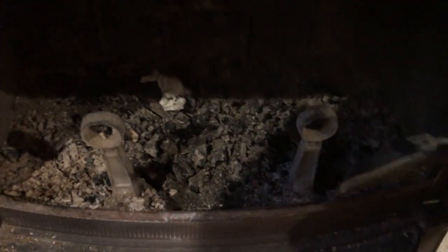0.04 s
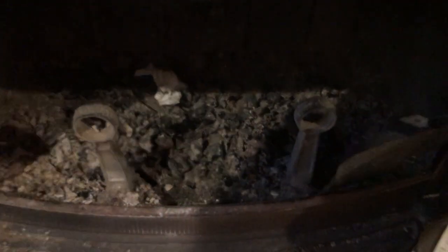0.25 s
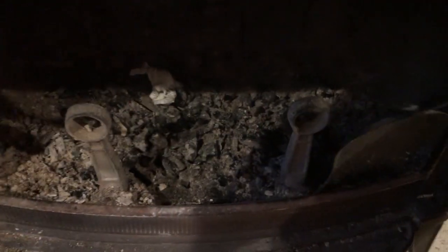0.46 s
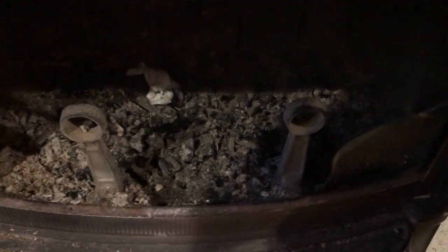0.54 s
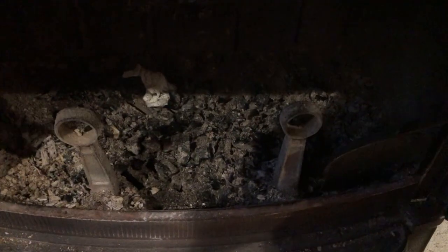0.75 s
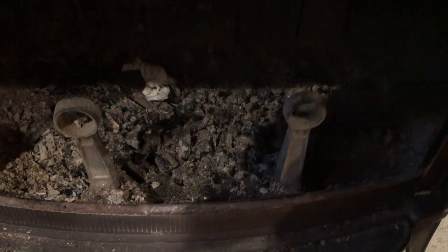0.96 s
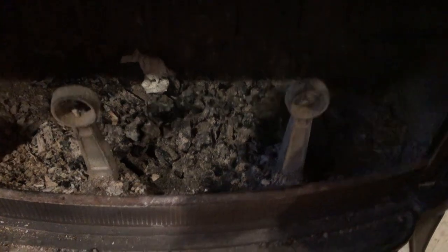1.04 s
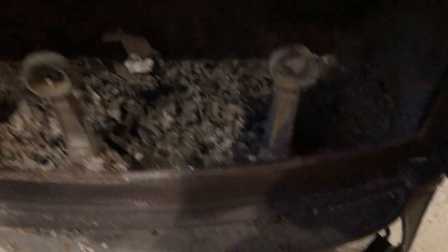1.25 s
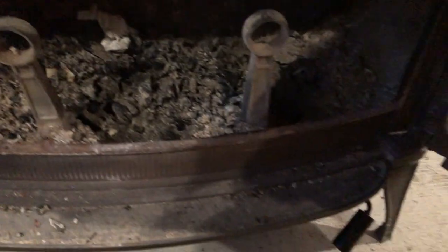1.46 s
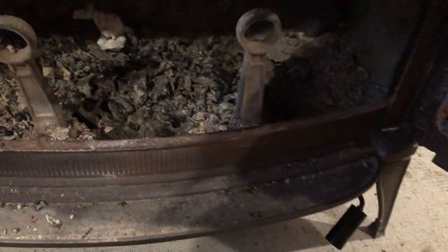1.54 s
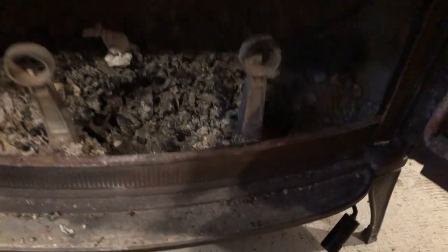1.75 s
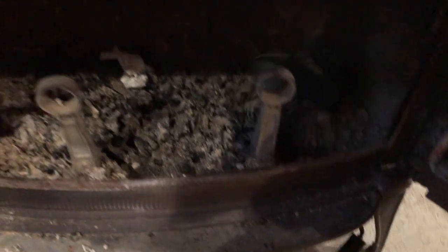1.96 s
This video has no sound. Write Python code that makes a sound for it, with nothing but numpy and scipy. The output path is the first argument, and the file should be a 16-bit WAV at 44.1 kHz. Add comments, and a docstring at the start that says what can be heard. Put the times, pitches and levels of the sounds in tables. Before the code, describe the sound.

Metal shovel scraping and knocking in the ash and charcoal of an iron stove.

```python
"""A steel shovel is pushed twice through the ash of a wood stove, hits the iron wall and sheds its
crumbs, then knocks on the front rim and is dragged across the gritty floor. Friction and impact supply
the force: its treble and middle excite the modes of the blade, its bass those of the stove body, and
the firebox booms after it. The room is quiet; the sound is heard on the left channel."""
import sys
import numpy as np
from scipy import signal
from scipy.fft import rfft, irfft
from scipy.io import wavfile
from scipy.ndimage import uniform_filter1d, map_coordinates

SR = 44100
rng = np.random.default_rng(int(sys.argv[2]) if len(sys.argv) > 2 else 0)


def materialize(psi):
    """Save the field psi as 16-bit PCM at rate SR to the path in sys.argv[1].

    A 1-D psi becomes a single channel; in a 2-D psi each row is a channel.
    """
    bounded = np.clip(np.atleast_2d(psi).T, -1, 1)
    quanta = np.round(bounded * 32767).astype(np.int16)
    wavfile.write(sys.argv[1], SR, quanta)


N = 88200
LOW_HZ, HIGH_HZ, TOP_HZ = 703.2, 3145, 15850  # upper edges of bass, middle and treble
SLIP_PER_S, SLIP_DB = 260, 3.5  # rate and depth of stick-slip fluctuation
DUST_LOW_HZ = 2460

# impacts of the shovel: start_s, contact_s, treble_db, middle_db, bass_db, rim_db
IMPACTS = [(0.217,.005,-31.5,-62,-41,-68),(0.7914,0.0057,-28.5,-28,-37.5,-70),(0.803,0.0077,-53,-51,-27,-66),(0.8172,0.0053,-34,-34,-20.5,-59),(0.832,0.0022,-38,-55,-23.5,-60),(0.842,0.0056,-43.5,-36.5,-30,-61),(0.853,0.01,-40.5,-45.5,-31,-73),
           (1.415,0.0051,-38,-35.5,-44,-63.5),(1.42,0.0034,-25.5,-53,-53.5,-29),(1.4394,0.0076,-31.5,-36,-37.5,-42),(1.471,0.012,-37.5,-75,-42.5,-78),(1.5487,0.008,-35.5,-47.5,-53,-55.5),(1.5939,0.011,-33,-45.5,-38.5,-66),(1.635,0.0077,-32.5,-38,-58,-80),(1.6965,0.0039,-33,-34,-39.5,-53),(1.7173,0.0043,-52,-40,-35,-54),(1.732,0.0065,-41,-37,-48,-48)]


def grit(per_s=5000, spread_db=4):
    """Stick-slip friction: tiny contacts at random times, their strength swelling and sinking."""
    contacts = (rng.random(N) < per_s / SR) * rng.choice([-1, 1], N)
    strength = undb(spread_db * rng.standard_normal(N).clip(-2, 2))
    return unit(contacts * strength * undb(SLIP_DB * wander(SLIP_PER_S)))


def scrapes():
    """Sliding friction: the force of each of the three strokes, in treble, middle and bass."""
    # envelopes of the strokes: time_s, treble_db, middle_db, bass_db
    first_push = [(.214,-84,-95,-65.5),(.222,-37,-48.5,-59),(.236,-42.5,-59.5,-50.5),(.262,-44,-54,-50),(.274,-46,-57.5,-52),(.306,-45,-54.5,-53),(.313,-37,-54,-49.5),(.364,-40.5,-46,-50),(.38,-57.5,-67.5,-48.5),(.408,-58.5,-53.5,-54.5),(.46,-59,-62.5,-59.5)]
    second_push = [(.46,-53,-63.5,-59),(0.507,-42,-58,-58.5),(.545,-34,-46,-46.5),(.602,-29.5,-35.5,-38.5),(0.622,-29.5,-38,-39),(0.633,-77,-44.5,-48),(.658,-51.5,-55.5,-51.5),(.748,-50,-59.5,-62),(0.788,-49,-55.5,-45.5)]
    drag = [(1.489,-67,-85,-59),(1.533,-45,-65,-57),(1.544,-35.5,-68,-43.5),(1.565,-41,-56,-51),(1.584,-36.5,-41,-50),(1.593,-30.5,-38,-40.5),(1.619,-32.5,-36.5,-47),(1.632,-42.5,-51,-39.5),(1.66,-31.5,-33,-40.5),(1.673,-31.5,-42,-41),(1.684,-61,-59,-49.5),(1.713,-42.5,-49,-41),(1.732,-36,-35.5,-38.5),(1.746,-44.5,-57,-52.5),(1.826,-54,-63.5,-77),(1.917,-54.5,-66.5,-72),(1.957,-49,-51.5,-52),(2.0,-45.5,-59.5,-59)]
    # friction spectra: frequency_hz, first_push_db, second_push_db, drag_db
    spectra = [(30,-20.5,-29.5,-35),(64.4,3,-17.5,6),(140,5,2.5,-9),(215,5,2.5,1.5),(320,6.5,-5,9),(540,6,2,6.5),(738,2,2,5.5),(1060,4,3.5,-2.5),(1950,1.5,2.5,0.5),(2800,-4.5,-2.5,-8),(3800,0.5,-5,-2.5),(7600,-3,-1.5,-6.5),(10000,-2,-4,-2.5),(11900,-10.5,-7.5,-8.5),(15730,-6,-4.5,-8.5)]
    hz, *colours = np.transpose(spectra)
    forces = []
    for stroke, colour in zip([first_push, second_push, drag], colours):
        times, *levels = np.transpose(stroke)
        friction = bands(tint(grit(), hz, colour))
        forces.append(np.array([band * curve(times, db) for band, db in zip(friction, levels)]))
    return forces


def blows():
    """Impact as a brief chatter of contacts: its force in three bands, and the impulses on the rim."""
    # impact spectrum: frequency_hz, level_db
    spectrum = [(30,-21),(60,-14),(110,1),(190,-5),(400,2),(600,-8),(800,-9),(1400,-3),(2500,0),(3500,-2.5),(7500,2),(10000,-3),(15800,-7.5)]
    chatter = tint(grit(), *np.transpose(spectrum))
    force, rim_push = 0, np.zeros(N)
    for start_s, contact_s, *band_db, rim_db in IMPACTS:
        pulse = burst(start_s, contact_s) + 1e-12
        pulse_rms = np.sqrt(np.mean(pulse ** 2))
        force += np.array(bands(chatter * pulse)) * pulse_rms * undb(band_db)[:, None]
        rim_push[int(start_s * SR)] = undb(rim_db) * np.sqrt(contact_s * SR)
    return force, rim_push


def bite(gain_db=-8):
    """Onset transient: a hard click as steel meets iron at each blow."""
    clicks = np.zeros(N)
    for start_s, contact_s, treble_db, *_ in IMPACTS:
        clicks[int(start_s * SR)] = undb(treble_db + gain_db) * np.sqrt(contact_s * SR)
    return cut(clicks, HIGH_HZ, "high", order=2)


def blade_responses():
    """Modal resonance: each of five ways of holding the blade weights the same modes differently."""
    # blade modes: pitch_hz, t60_s, first_push_db, second_push_db, drag_db, struck_db, free_db
    blade_modes = [(1085,0.17,-8.5,-23.5,-21,-7,-30),(1629,0.047,-40,-22,-11,-6,-10),(1681,0.18,-6.5,-4,-20,-6,1),(2483,0.085,-32,-19,-22,-11,-21),(2631,0.2,-31,-7.5,-27,-13,-2),(2720,0.064,-38,-23,-31,-6.5,-27.5),(3137,0.28,-20,-27.5,-15,-24.5,-12.5),(3410,0.21,-14.5,-26,-39,-45.5,-28),(3565,0.11,-14.5,-25,-32,-35.5,-33),(3860,.16,-10.5,-21,-28,-33.5,-21),(3956,0.074,-13,-21.5,-26,-12.5,-15),(4082,0.12,-12.5,-13,-21,-19,-28),(4425,0.23,-24.5,-27.5,-41,-27.5,-16),(5100,0.19,-25,-23,-36,-34.5,-47),(5350,0.18,-22,-18,-22,-15,-40),(5650,0.093,-12.5,-22.5,-41,-23,-42),(5940,0.057,-26,-18.5,-20,-14,-14),(6210,0.063,-22,-18,-11.5,-28,-7.5),(7080,0.15,-9,-15.5,-28,-27.5,-18),(7479,0.28,-34,-23,-32,-28,-10),(7780,0.076,-14,-15.5,-33,-17.5,-9),(8179,0.152,-29.5,-15.5,-30,-21.5,-20),(8550,0.072,-30,-18.5,-12,-24,-11),(9260,.18,-19,-23,-14,-22.5,-20),(9750,.17,-24.5,-19.5,-20,-31,-18),(11922,.14,-23.5,-23.5,-11,-25,-18)]
    hz, t60, *weightings = np.transpose(blade_modes)
    band_hz = np.where(hz < HIGH_HZ, HIGH_HZ - LOW_HZ, TOP_HZ - HIGH_HZ)
    return [modes(hz, t60, db + 10 * np.log10(2 * band_hz / SR)) for db in weightings]


def waver(ring, depth=0.001, per_s=23):
    """Frequency modulation: the blade's pitch shifts a little as the point of contact moves."""
    return map_coordinates(ring, [np.arange(N) + np.cumsum(depth * wander(per_s))], order=3)


def sheet_response(count=150):
    """Superposition of the shovel's many weak modes, the direct path and the reflections."""
    t = clock()[:N // 4]
    hz = np.linspace(LOW_HZ, TOP_HZ, count) + (TOP_HZ - LOW_HZ) / count * (rng.random(count) - .5)
    ring = np.sin(2 * np.pi * (hz[:, None] * t + rng.random((count, 1)))).sum(axis=0)
    steel = undb(-5) * np.pad(fade(ring, t60_s=.14), (0, N - len(t)))
    steel[0] += undb(-8)  # direct path
    firebox_echoes = undb(-3.5) * fade(rng.standard_normal(N), t60_s=.027)
    room_tail = undb(-15) * fade(rng.standard_normal(N), t60_s=.22)
    return steel + firebox_echoes + room_tail


def judders():
    """Stick-slip oscillation: the pushed blade groans at a low, unsteady pitch."""
    # groans: centre_s, half_length_s, pitch_hz, width_hz, level_db
    groans = [(.48,.065,162,22,-56),(.6,.035,135,70,-48)]
    out = 0
    for centre_s, half_s, hz, width_hz, db in groans:
        swell = np.exp(-((clock() - centre_s) / half_s) ** 2)
        phase = 2 * np.pi * np.cumsum(hz + width_hz / 2 * wander(width_hz * 2)) / SR
        out += undb(db + SLIP_DB * wander(width_hz * 2)) * swell * np.sqrt(2) * np.sin(phase)
    return out


def stove_response(split_hz=267, rise_s=0.0049):
    """Impulse response of the iron: a knock, its modes, and a deep thud delayed by the plates' inertia."""
    # body modes: pitch_hz, t60_s, level_db
    iron_modes = [(108,0.026,-14),(143,0.17,-14.5),(268.2,0.41,-13.5),(358.4,0.24,-13.5),(441.5,0.18,-21),(509,0.17,-12.5),(592.7,0.048,-4.5),(775,0.99,-14.5),(881,0.75,-26),(1045,0.92,-17.5)]
    noise = fade(rng.standard_normal(N), t60_s=.07)
    knock = undb(-3) * noise
    knock[0] += undb(-4)  # direct path
    rise = 1 - np.exp(-(clock() / rise_s) ** 2)
    thud = cut(noise * rise, split_hz, "low", order=3)
    thud *= undb(-5) * np.sqrt(2 * split_hz / SR) / np.linalg.norm(thud)
    ring = modes(*np.transpose(iron_modes)) * np.sqrt(2 * LOW_HZ / SR)
    return cut(knock, split_hz, "high", order=3) + thud + ring


def firebox_response():
    """Cavity reverberation: the long hollow boom that follows a contact."""
    # cavity spectrum: frequency_hz, level_db
    spectrum = [(40,-11.5),(75,0),(170,-0.5),(270,-3.5),(450,0),(560,1),(680,-15.5),(880,-6.5),(1400,-11.5),(2500,-35)]
    boom = tint(rng.standard_normal(N), *np.transpose(spectrum))
    return undb(-11) * np.sqrt(2 * LOW_HZ / SR) * fade(boom, t60_s=1.7)


def front_rim(push, rest_s=1.535, damping_t60_s=0.047):
    """Contact damping: the rim rings freely until the shovel rests on it."""
    # rim modes: pitch_hz, t60_s, level_db
    rim_modes = [(448,0.71,-0.5),(585,0.25,-2.5),(628,0.16,1),(1093,0.33,-25),(1640,0.16,-17.5),(2830,0.111,-7.5)]
    ring = modes(*np.transpose(rim_modes))
    held_s = np.maximum(clock() - rest_s, 0)
    free = through(push * (held_s == 0), ring) * np.exp(-np.log(1000) * held_s / damping_t60_s)
    damped = through(push * (held_s > 0), fade(ring, damping_t60_s))
    return cut(free + damped, 310, "high")  # the rim's ring carries no bass below about 310 Hz


def crackle(scrape_treble):
    """Brittle fracture of charcoal: sparse snaps that follow the scraping, and a few big lumps."""
    # cracking lumps: start_s, level_db
    cracks = [(.311,-41),(0.366,-29),(0.5967,-27.5),(0.603,-34),(.612,-30.5),(0.625,-33),(1.6575,-29),(1.74,-32)]
    strength = np.sqrt(np.abs(uniform_filter1d(scrape_treble ** 2, int(SR / SLIP_PER_S))))
    snaps = undb(-9) * strength * unit(cut(grit(per_s=260), HIGH_HZ, "high", order=1))
    envelope = sum(undb(db) * burst(s, length_s=.0013) for s, db in cracks)
    return snaps + unit(cut(grit(), LOW_HZ, "high")) * envelope


def spill():
    """Granular flow: fine ash hisses off the lifted blade and trickles away."""
    # envelope of the flow: time_s, level_db
    flow = [(.9,-57),(.921,-50.5),(.936,-37),(.948,-41),(.962,-48),(1.0,-66),(1.14,-64.5),(1.22,-83),(1.4,-81.5)]
    return unit(cut(grit(per_s=2300), DUST_LOW_HZ, "high", order=3)) * curve(*np.transpose(flow))


def cinders(edge_ratio=1.06):
    """Damped resonance: bits of charcoal land with a dusty tick and tinkle briefly."""
    # landings: start_s, level_db, pitch_hz
    landings = [(1.026,-56,7550),(1.0564,-51,8400),(1.071,-57,6500),(1.093,-60,8100),(1.1362,-54.5,3670),(1.156,-53.5,2820),(1.1872,-57.5,3044)]
    out = 0
    for start_s, db, hz in landings:
        tick = rng.standard_normal(N) * burst(start_s, length_s=.003)
        tinkle = cut(tick, [hz / edge_ratio, hz * edge_ratio], "band", order=1)
        dust = undb(-1) * cut(tick, DUST_LOW_HZ, "high")
        out += undb(db) * (tinkle * np.std(tick) / np.std(tinkle) + dust)
    return out


def bumps():
    """Handling noise: two soft, low bumps."""
    # handling bumps: start_s, level_db
    handling = [(1.213,-55),(1.293,-52.5)]
    envelope = sum(undb(db) * burst(s, length_s=.018) for s, db in handling)
    push = unit(cut(grit(), [206, 333], "band", order=3)) * envelope
    return cut(push, LOW_HZ, "low")


def room():
    """Ambient noise floor: faint, steady and strongest in the bass."""
    frequency_hz = [25, 70, 160, 400, 1500, 5000, 12000, 15000]
    level_db = [4, 1.5, -1, -4.5, -13.5, -19, -23.5, -38]
    return undb(-74) * unit(tint(rng.standard_normal(N), frequency_hz, level_db))


def modes(hz, t60_s, db):
    """Modal synthesis: a sum of damped sinusoids."""
    t = clock()[:N // 2]
    ring = sum(undb(d) * fade(np.sin(2 * np.pi * f * t), s) for f, s, d in zip(hz, t60_s, db))
    return np.pad(ring, (0, N - len(t)))


def fade(x, t60_s):
    """Exponential decay, scaled to unit energy."""
    y = x * np.exp(-np.log(1000) * np.arange(len(x)) / SR / t60_s)
    return y / np.linalg.norm(y)


def through(x, response):
    """Convolution with an impulse response."""
    return signal.fftconvolve(x, response)[:N]


def burst(start_s, length_s):
    """Half-Gaussian envelope of a contact: sudden onset, smooth release."""
    age = (clock() - start_s) / length_s
    return (age >= 0) * np.exp(-age ** 2)


def curve(times, db):
    """Gain interpolated in decibels, silent outside the given times."""
    return undb(np.interp(clock(), times, db, left=-200, right=-200))


def wander(per_s):
    """Linear interpolation between Gaussian random values."""
    return np.interp(clock() * per_s, np.arange(N), rng.standard_normal(N))


def bands(x):
    """Crossover into treble, middle and bass, each at rms 1."""
    treble = cut(x, HIGH_HZ, "high")
    middle = cut(x, [LOW_HZ, HIGH_HZ], "band")
    bass = cut(x, LOW_HZ, "low", order=3)
    return unit(treble), unit(middle), unit(bass)


def tint(x, hz, db):
    """Spectral shaping along a gain curve in log frequency."""
    f = np.maximum(np.arange(N // 2 + 1) * SR / N, 1)
    return irfft(rfft(x) * undb(np.interp(np.log(f), np.log(hz), db)), N)


def cut(x, hz, kind, order=4):
    """Butterworth filter."""
    return signal.sosfilt(signal.butter(order, hz, kind, fs=SR, output="sos"), x)


def undb(db):
    """Decibels to gain."""
    return 10 ** (np.asarray(db) / 20)


def unit(x):
    """Scale to rms 1."""
    return x / np.sqrt(np.mean(x ** 2))


def clock():
    """Time of every sample in seconds."""
    return np.arange(N) / SR


def scene():
    """Source and resonator: scrapes and blows ring the shovel above and the stove below."""
    steel, iron = sheet_response(), stove_response()
    *contact_rings, free_ring = blade_responses()
    strokes = scrapes()
    hits, rim_push = blows()
    ash = spill()
    ringing = sum(through(treble + middle, ring)
                  for (treble, middle, _), ring in zip(strokes + [hits], contact_rings))
    treble, middle, bass = sum(strokes) + hits
    shovel = through(treble + middle + ash, steel) + waver(ringing) + through(ash, free_ring) + judders()
    stove = through(bass + bumps(), iron) + front_rim(rim_push)
    boom = through(bass + middle, firebox_response())
    left = shovel + bite() + stove + boom + crackle(sum(strokes)[0]) + cinders() + room()
    return np.array([left, undb(-82) * left])


def record(dry):
    """Band limiting: the microphone's gain, its loss of deep bass and a steep cut of the top."""
    heard = undb(4.5) * cut(dry, 63, "high", order=3)
    return signal.sosfilt(signal.ellip(10, .2, 80, TOP_HZ, fs=SR, output="sos"), heard)


dry = scene()
out = record(dry)
materialize(out)
```